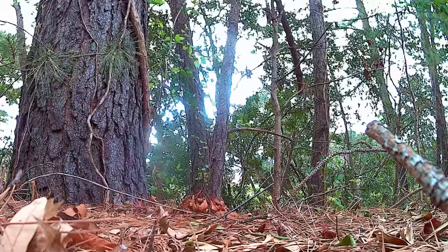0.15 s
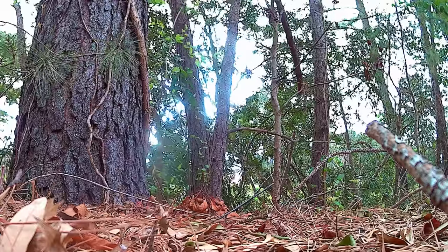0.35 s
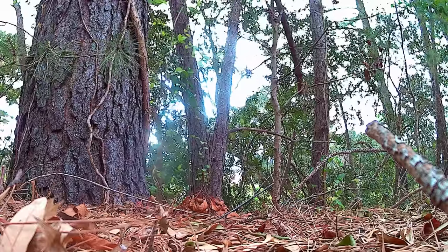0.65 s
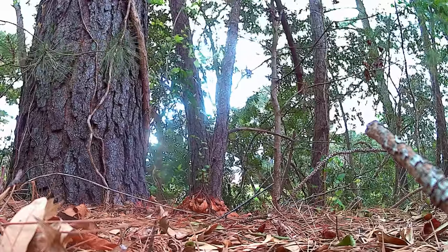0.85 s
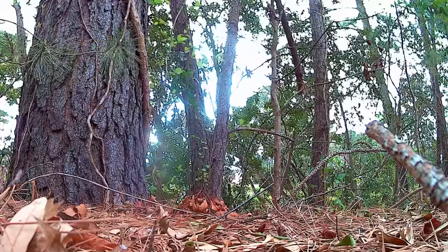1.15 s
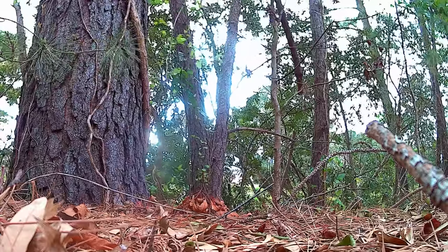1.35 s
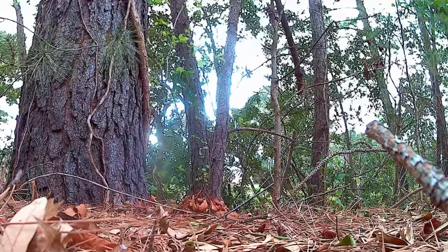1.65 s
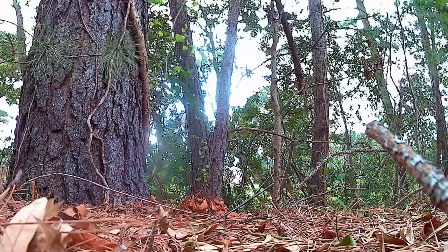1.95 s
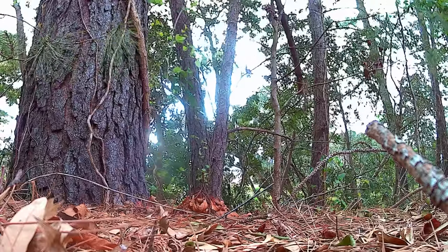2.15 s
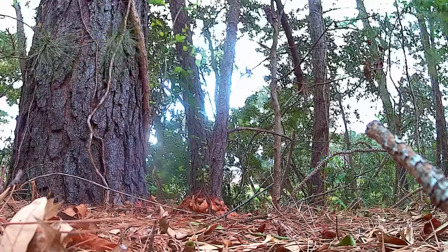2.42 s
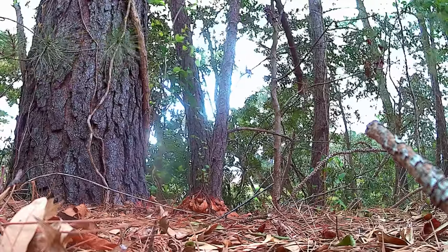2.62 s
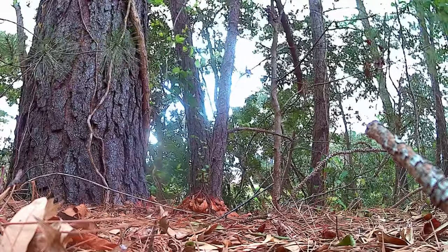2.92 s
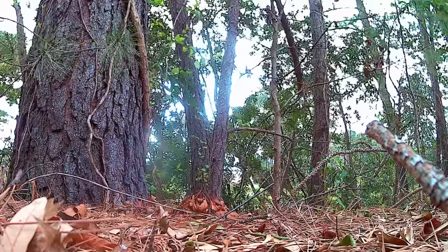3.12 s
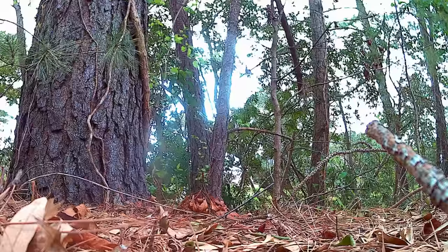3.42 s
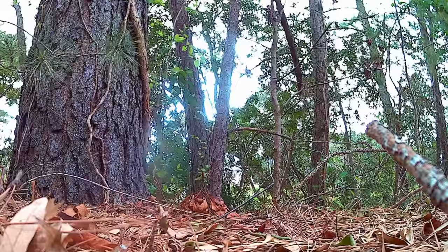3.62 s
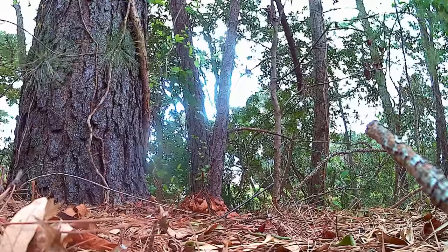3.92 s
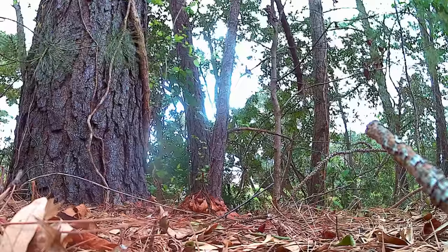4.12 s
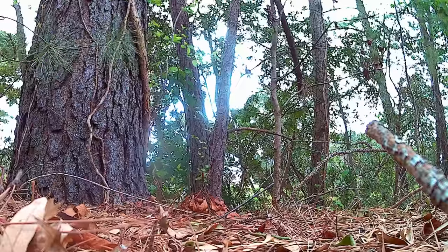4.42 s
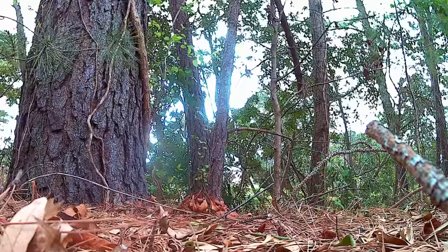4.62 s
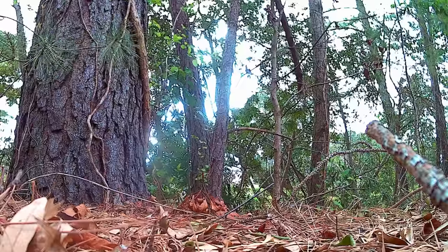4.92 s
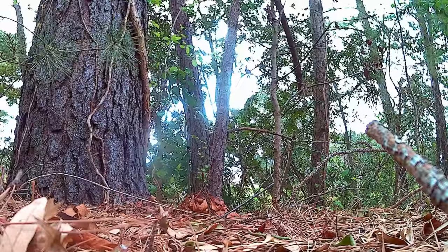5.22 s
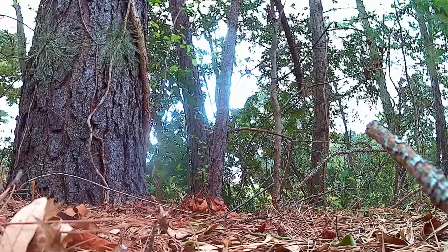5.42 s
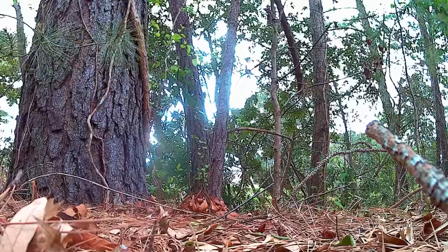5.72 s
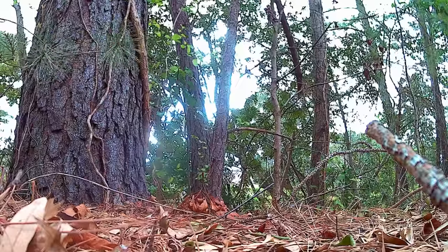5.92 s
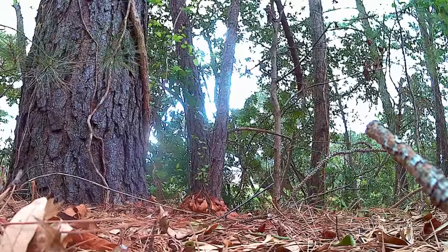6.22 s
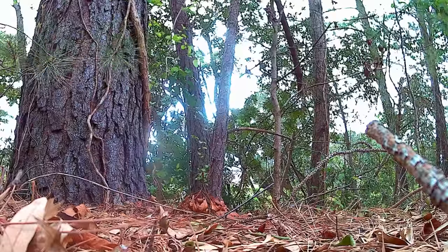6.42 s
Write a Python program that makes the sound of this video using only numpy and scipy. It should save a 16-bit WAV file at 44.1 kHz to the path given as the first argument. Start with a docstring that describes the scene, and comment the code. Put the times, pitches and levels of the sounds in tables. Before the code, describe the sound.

Woodland birdsong: distant thin warbling first, then a near bird's bright slurs, quick whips and growing trills over faint hiss and low wind rumble.

```python
"""A near bird on the right of a pine wood sings varied phrases: bent, nearly pure whistles, often repeated.
Early on, a high warbling song slides from note to note a little to the left and ends in quiet notes.
A third bird gives two spells of thin calls that drop in two steps, among stray notes of other birds.
Trunks scatter the songs as random echoes. Shaped noise makes the foliage hiss, the murmur of the air
and the rumble of wind on the microphone; short noise bursts make ticks in the leaf litter."""
import sys
import numpy as np
from scipy import signal
from scipy.fft import rfft, irfft
from scipy.io import wavfile
from scipy.ndimage import uniform_filter1d, map_coordinates

SR = 44100
rng = np.random.default_rng(int(sys.argv[2]) if len(sys.argv) > 2 else 0)


def put_to_file(sound):
    """Save the sound as 16-bit audio at rate SR, in the file named by the first command-line argument."""
    columns = np.atleast_2d(sound).T  # one column per channel
    safe = np.clip(columns, -1, 1)
    whole_steps = np.round(safe * 32767)
    wavfile.write(sys.argv[1], SR, whole_steps.astype(np.int16))


N = 289296
TIME = np.arange(N) / SR  # seconds

# Syllables of the near bird and the far birds, each one gesture of the syrinx (the bird's voice organ).
# Each holds: length, attack and release in seconds, swell from start to end in dB, overtone in dB,
# then a list of evenly spaced pitches in Hz, before any pitch factor.
DROP = (.039, 0.0042, 0.0095, 0, -31, [3080, 2530, 2177, 2110, 2050])  # falls, then levels out
SCOOP = (0.061, 0.021, 0.014, 5.3, -41, [2970, 2776, 2884, 3130, 3430, 3515, 3640])  # dips, then climbs
SLUR = (.056, .027, 0.011, 3.3, -40, [2400, 2660, 2963, 3304, 3490, 3528])  # climbs smoothly
FLICK = (0.013, 0.0042, 0.005, 3, -18.5, [2300, 3050, 3500])  # very short climb
SIGH = (0.084, .004, 0.0086, -27, -19.5, [1753, 1450, 1317, 1160, 1090])  # low fall that dies away
WHIP = (.035, 0.013, 0.011, -2.3, -30, [5140, 5073, 4725, 4080, 2760, 1760])  # steep fall
PIP = (0.032, 0.0042, 0.0062, 15.8, -32.5, [1450, 1662, 1903, 2076, 2065])  # low climb that swells
SQUEAK = (.079, .008, 0.0063, 15, -10.5, [3100, 3700, 3640, 3570, 3530, 4200, 5120, 5270])  # climbs, holds, climbs again
SWING = (0.14, 0.0036, 0.0034, 0, -34, [4100, 4000, 3880, 3840, 3850, 3970, 4570, 5150])  # sags, then climbs
MEW = (0.1, 0.019, 0.017, -8.5, -40, [2610, 2460, 2187, 2108, 2070, 2100])  # gentle fall
LISP = (0.02, 0.0074, 0.009, 0, -40, [6300, 6840, 7220, 7398])  # very high climb
TICK = (0.011, 0.0072, 0.0049, 2, -23, [7940, 6930, 5360, 2600])  # very short fall from high up
CHUP = (0.014, 0.0016, 0.0037, -13.5, -23, [1890, 1567, 1350, 1240])  # short low fall
WHEEP = (0.038, 0.0081, 0.011, 5.6, -34.5, [1997, 2178, 2550, 2716, 2680])  # low climb
ZIP = (.008, 0.006, 0.0027, 3, -23, [2500, 3400, 5330])  # very short climb
CHIP = (0.026, 0.011, 0.015, 0, -21, [2280, 3940, 5070, 4420, 2900, 2080])  # up and down again
PEEP = (0.04, .01, 0.015, -8, -31, [4460, 3480, 3370, 3363, 3360])  # falls onto a held pitch
PIT = (0.025, 0.011, 0.014, 0, -36, [3350, 3300, 3070])  # short slight fall

# Motifs, groups of syllables repeated together.
# Each row: delay in seconds, syllable, level in dB relative to the trill.
RISING = [(0, FLICK, -13), (.003, SLUR, 0.5)]
TICKING = [(0, LISP, -14), (.02, TICK, 1)]
SEESAW = [(0, CHUP, -18.5), (.058, WHEEP, -1)]

# Whip notes, each answered by a run of three low pips.
# Each row: start in seconds, level in dB, pitch factor of the whip, pitch factor of the pips.
WHIPS = [(2.205, -13.5, 0.99, 0.991), (2.439, -14, 1.001, .97), (2.651, -15.5, 1.004, 1.005)]
# The pips: wait after the whip starts, spacing, level against the whip, change from pip to pip.
PIP_DELAY_S, PIP_EVERY_S, PIP_DB, PIP_GROWTH_DB = .037, 0.042, -12.5, -0.94

# Notes of the near bird outside its trills and whip runs. The high FLICK is an overtone at the start
# of SQUEAK; the half-pitch PEEP is an undertone of the other PEEP.
# Each row: start in seconds, syllable, level in dB, pitch factor.
SINGLES = [(1.653, DROP, -25.5, 1.018), (1.739, SCOOP, -20, 1.008), (2.056, SIGH, -44, 1.004),
           (2.868, FLICK, -33.5, 2.18), (2.869, SQUEAK, -36, 1.003), (4.588, SWING, -32, 1.005),
           (4.798, FLICK, -37, 1.01), (4.802, MEW, -29, 1), (5.708, ZIP, -17, 1.19),
           (5.712, CHIP, -9, 0.98), (5.735, PEEP, -21.5, 1), (5.735, PEEP, -41, .5)]

# Colour of the rasp, the hoarse noise in the near bird's high notes.
# Each row: frequency in Hz, strength in dB per Hz (only the shape counts).
RASP_COLOUR = [(1800, 2), (6000, -8), (8500, 2.5), (10000, 11.5), (15500, -17)]

# The high warbling song.
# Each row: start in seconds, level in dB, length in seconds, slide from Hz, slide to Hz, swell in dB,
# swoop in from above in Hz, depth of the quaver in Hz.
WARBLE = [(.279, -37.5, 0.11, 5156, 5500, 10.5, 1900, -4), (.56, -40, 0.091, 5870, 5750, 3, 1600, 3),
          (.72, -45, 0.1, 4950, 5370, 3, 1700, 0), (.863, -40, 0.064, 6060, 4840, 7, 0, 0),
          (.922, -39, 0.037, 4930, 5390, 8, 0, 4), (1.003, -44, 0.041, 5970, 5800, 0, 1500, 2),
          (1.044, -42.5, .087, 6160, 6610, 0, 0, 480), (1.203, -42.5, 0.054, 7180, 5300, -1, -2, 0),
          (1.308, -42, 0.083, 6300, 4980, -3, 0, 0), (1.39, -53, 0.043, 4840, 4400, 0, 0, 0),
          (1.44, -44, 0.036, 5030, 5320, 4, 2, 2)]
SWOOP_S, QUAVER_HZ, GLIDE_FADE_S = .008, 38, .006

# The calling bird drops onto a held pitch, then slips to a quiet low tail.
# Each row: start in seconds, level in dB, held pitch in Hz, time of the slip in seconds after the start.
CALLS = [(.159, -36, 5430, 0.056), (.459, -37.5, 5360, 0.061), (.806, -45.5, 3775, 0.096),
         (1.139, -41.5, 4500, 0.19), (3.970, -42.5, 5280, 0.08), (4.237, -44.5, 4630, 0.11),
         (4.567, -39.5, 5390, 0.075), (4.892, -44.5, 3840, 0.077), (5.237, -44.5, 4595, 0.13),
         (5.580, -36, 5290, 0.063), (5.894, -43, 3785, .1), (6.201, -35.5, 5500, 0.056),
         (6.497, -35.5, 5180, 0.063)]
CALL_TOP_HZ, CALL_TAIL_HZ, FALL_AT_S, FALL_S, SLIP_S, TAIL_S = 6960, 3270, .017, 0.00375, 0.0039, 0.058
CALL_ATTACK_S, CALL_SAG_DB_PER_S, TAIL_DB = 0.021, -115, -12

# Stray notes of other birds.
# Each row: start in seconds, level in dB, length in seconds, slide from Hz, slide to Hz.
STRAYS = [(.01, -58.5, 0.087, 2450, 2750), (.648, -54.5, .03, 2350, 2650), (.87, -52, 0.034, 2225, 1700),
          (1.06, -44, 0.013, 2000, 5100), (1.197, -48.5, 0.096, 2210, 2590),
          (1.205, -52, 0.061, 3250, 3770), (1.3, -37.5, 0.015, 2790, 4330), (1.46, -54, .06, 2190, 2550),
          (1.411, -42, 0.013, 2610, 1530), (1.515, -43.5, 0.08, 6250, 5760),
          (1.52, -40.5, .075, 5600, 4870), (4.08, -48, .02, 2080, 1820), (4.228, -41.5, 0.013, 1700, 5880),
          (6.13, -61, .07, 3200, 3000)]

# Small dry ticks in the leaf litter. Each row: start in seconds, strength in dB before the snap is shaped.
TICKS = [(0.807, -41), (3.406, -34), (4.728, -30), (5.868, -32), (5.931, -36)]

# Slow level curves of the foliage hiss, the wind rumble and the trees round the warbling bird.
# Each row: time in seconds, level in dB before the overall shift made in background().
HISS = [(0.0, -61), (0.51, -62), (2.68, -68.5), (3.2, -67.5), (4.29, -60), (5.06, -61.5), (6.56, -60.5)]
RUMBLE = [(0.0, -64), (0.55, -62.5), (2.04, -67), (4.44, -48), (6.52, -51.5), (6.56, -59.5)]
TREES = [(0, -56), (1.1, -59), (1.8, -67.5), (2.6, -76), (6.56, -86.5)]

# Colours of the background noises: foliage hiss, murmur of the air, wind rumble and trees.
# Each row: frequency in Hz, strength in dB per Hz (only the shape counts).
HISS_COLOUR = [(900, -13), (1800, -0.5), (3200, -8), (5000, -1.5), (6500, -2), (8500, -2.5), (11500, 3),
               (15500, -7.5)]
LOW_COLOUR = [(50, 9), (120, -0.5), (320, -1.5), (420, -3.5), (700, -5.5), (1200, -10), (2500, -19)]
RUMBLE_COLOUR = [(8, 19), (20, 0), (40, -6.5), (70, -31), (120, -53)]
TREES_COLOUR = [(100, -6.5), (300, -7), (600, 2), (1200, -12), (2200, -11.5), (4000, -9), (6000, -6),
                (8000, -15), (15000, -14.5)]

CUTOFF_HZ = 15900


def near_bird(third_db=17.5, octave_db=-19, rasp_db=-21.0, ring_hz=10000, ring_db=9):
    """Loud and almost dry; forced high syllables turn harsh and splash echoes off the nearest trunks."""
    song = sing(phrases(), jitter=0.0027, flutter_db=1.0)
    top = signal.butter(2, 3700, "high", fs=SR, output="sos")
    high = signal.sosfilt(top, signal.sosfilt(top, song))

    # squares and cubes make overtones that grow faster than the note itself
    overtones = from_db(third_db) * high ** 3 + from_db(octave_db) * high ** 2
    above = signal.butter(6, 7500, "high", fs=SR, output="sos")
    edge = signal.sosfilt(above, overtones)
    # they come in uneven spurts
    edge = edge * (1 + wander(N, 504) / 2)

    # hoarse noise that follows the power of the high notes
    power = uniform_filter1d(high ** 2, size=128)
    rasp = 2 * np.pi * from_db(rasp_db) * power * noise(RASP_COLOUR, alike=1)[0]

    # overtones flare as they pass through a narrow resonance of the throat
    throat = signal.iirpeak(ring_hz, 24, fs=SR)
    flare = from_db(ring_db) * signal.lfilter(*throat, song + edge)

    splash = scatter(high + edge, t60=.065, wet_db=-10.5)
    echo = scatter(song, t60=0.2, wet_db=-21.0)
    return placed(song + edge + flare + rasp + splash + echo, left_db=-25.5)


def phrases():
    """The near bird's song: separate notes, rising slurs, whips with their pips, and two growing trills."""
    rows = SINGLES + trill(RISING, start_s=1.848, count=2, every_s=0.1, db=-19, growth_db=2)
    for s, db, whip_factor, pip_factor in WHIPS:
        pips = trill([(PIP_DELAY_S, PIP, PIP_DB)], s, count=3, every_s=PIP_EVERY_S, db=db,
                     growth_db=PIP_GROWTH_DB, factor=pip_factor)
        rows = rows + [(s, WHIP, db, whip_factor)] + pips
    ticking = trill(TICKING, start_s=4.969, count=4, every_s=.0805, db=-24.5, growth_db=1.7, slowing_s=0.0037)
    seesaw = trill(SEESAW, start_s=5.3005, count=3, every_s=0.1344, db=-16.0, growth_db=1.5)
    return rows + ticking + seesaw


def trill(motif, start_s, count, every_s, db, growth_db=0, slowing_s=0, factor=1):
    """Repeat a motif; each repeat may change in level, and the gaps may widen."""
    rows = []
    for k in range(count):
        repeat_s = start_s + k * every_s + k * (k - 1) / 2 * slowing_s
        for delay_s, syllable, part_db in motif:
            rows.append((repeat_s + delay_s, syllable, db + k * growth_db + part_db, factor))
    return rows


def sing(rows, jitter, flutter_db):
    """Whistle a list of syllables, each at its own time, level and pitch factor."""
    out = np.zeros(N)
    for s, syllable, db, factor in rows:
        pitch, loudness, overtone_db = gesture(*syllable)
        note = whistle(pitch * factor, loudness, overtone_db, jitter, flutter_db)
        add(out, s, from_db(db) * note)
    return out


def gesture(length_s, attack_s, release_s, swell_db, overtone_db, pitches):
    """Pitch, loudness and overtone of a syllable that bends smoothly through its pitches."""
    t = TIME[TIME < length_s]
    place = t / t[-1] * (len(pitches) - 1)
    pitch = map_coordinates(np.array(pitches, float), [place], order=2, mode="nearest")
    return pitch, envelope(t, attack_s, release_s, swell_db), overtone_db


def whistle(pitch, loudness, overtone_db, jitter, flutter_db, third_db=-41, breath_db=-48, beak_hz=7800):
    """The syrinx gives a slightly unsteady near sine; the beak passes the overtone less as it climbs."""
    size = len(pitch)
    unsteady = pitch * (1 + jitter * wander(size, 300))
    phase = 2 * np.pi * np.cumsum(unsteady) / SR
    first, second, third = np.sin(np.outer([1, 2, 3], phase))
    breathy = first * (1 + from_db(breath_db) * wander(size, 2500))
    passed = 1 / (1 + (2 * pitch / beak_hz) ** 20)
    tone = breathy + from_db(overtone_db) * passed * second + from_db(third_db) * third
    return tone * loudness * from_db(flutter_db * wander(size, 110))


def warbler():
    """High slurred notes a little to the left, ringing on among the trees."""
    song = notes(WARBLE, glide, overtone_db=-38.5, jitter=0.0022, flutter_db=1.15)
    echo = scatter(song, t60=0.4, wet_db=-5.0)
    return placed(song, left_db=3.0) + placed(echo, left_db=2.5)


def notes(rows, shape, overtone_db, jitter, flutter_db):
    """Whistle a table of notes that share one rule for pitch and loudness."""
    out = np.zeros(N)
    for s, db, *form in rows:
        pitch, loudness = shape(*form)
        add(out, s, from_db(db) * whistle(pitch, loudness, overtone_db, jitter, flutter_db))
    return out


def glide(length_s, from_hz, to_hz, swell_db=0, swoop_hz=0, quaver_hz=0):
    """Pitch and loudness of a straight slide, which may swoop in from above or quaver."""
    t = TIME[TIME < length_s]
    slide = np.linspace(from_hz, to_hz, len(t))
    swoop = swoop_hz * np.exp(-t / SWOOP_S)
    quaver = quaver_hz * np.cos(2 * np.pi * QUAVER_HZ * t)
    return slide + swoop - quaver, envelope(t, GLIDE_FADE_S, GLIDE_FADE_S, swell_db)


def far_birds():
    """Thin calls, stray notes and pits from deeper in the wood, with more echo; the buzz stays dry."""
    pits = trill([(0, PIT, 0)], start_s=3.255, count=2, every_s=.055, db=-56.5)
    pits = pits + trill([(0, PIT, 0)], start_s=3.73, count=3, every_s=.052, db=-56)
    calls = notes(CALLS, falling_call, overtone_db=-48, jitter=0.013, flutter_db=2.5)
    calls = calls + notes(STRAYS, glide, overtone_db=-28, jitter=0.013, flutter_db=1.5)
    calls = calls + sing(pits, jitter=.012, flutter_db=1.0)
    echo = scatter(calls, t60=0.25, wet_db=-7.5)
    return placed(from_db(-1) * (calls + echo) + buzz(), left_db=-23)


def falling_call(held_hz, slip_s):
    """Pitch and loudness of a call that comes down in two rounded steps."""
    t = TIME[TIME < slip_s + TAIL_S]
    # each step runs smoothly from 0 to 1
    fallen = 1 / (1 + np.exp((FALL_AT_S - t) / FALL_S))
    slipped = 1 / (1 + np.exp((slip_s - t) / SLIP_S))
    pitch = CALL_TOP_HZ + (held_hz - CALL_TOP_HZ) * fallen + (CALL_TAIL_HZ - held_hz) * slipped
    sag_db = CALL_SAG_DB_PER_S * np.maximum(t - CALL_ATTACK_S, 0)
    loudness = envelope(t, CALL_ATTACK_S, TAIL_S / 2) * from_db(sag_db + TAIL_DB * np.sqrt(slipped))
    return pitch, loudness


def buzz(start_s=4.342, length_s=.175, from_hz=3400, to_hz=2580, rate_hz=44, depth=0.088,
         level_db=-45, under_db=-10, over_db=-19):
    """A falling note with fast vibrato; its second partial is the strongest and follows from_hz to to_hz."""
    t = TIME[TIME < length_s]
    swing = 1 - depth * np.cos(2 * np.pi * rate_hz * t)
    # pi instead of 2 pi: the first partial lies an octave below the strongest
    phase = np.pi * np.cumsum(np.linspace(from_hz, to_hz, len(t)) * swing) / SR
    partials = np.sin(np.outer([1, 2, 3], phase))
    tone = from_db([under_db, 0, over_db]) @ partials
    loudness = envelope(t, attack_s=0.0095, release_s=0.019, swell_db=-7)
    out = np.zeros(N)
    add(out, start_s, from_db(level_db) * loudness * tone)
    return out


def litter(per_s=70, crackle_db=-59, spread_db=8.5, t60=0.011):
    """Dry needles and leaves tick: a few clear ones among many tiny ones that follow the foliage hiss."""
    hiss_db = in_time(HISS)
    chance_db = spread_db * np.minimum(rng.exponential(1, N), 3)
    size_db = crackle_db + hiss_db - hiss_db.max() + chance_db
    clicks = (rng.random(N) < per_s / SR) * from_db(size_db)
    for s, db in TICKS:
        add(clicks, s, from_db([db]))
    # every click becomes a short burst of dying noise
    size = SR // 20
    snap = rng.standard_normal(size) * from_db(-60 * TIME[:size] / t60) / 2
    snaps = signal.fftconvolve(clicks, snap)[:N]
    bright = signal.butter(1, 4500, "high", fs=SR, output="sos")
    return placed(signal.sosfilt(bright, snaps), left_db=-6)


def background(hiss_db=6, low_db=-55.5, rumble_db=19.5, trees_db=-3.5):
    """Foliage hiss, the low murmur of the air, wind on the microphone and rustling trees, all shaped noise."""
    hiss_level_db = in_time(HISS) + hiss_db + .5 * wander(N, 25)
    hiss = from_db(hiss_level_db) * noise(HISS_COLOUR, alike=0.65)
    low = from_db(low_db) * noise(LOW_COLOUR, alike=1.0)
    rumble = from_db(in_time(RUMBLE) + rumble_db) * noise(RUMBLE_COLOUR, alike=1.0)
    trees = from_db(in_time(TREES) + trees_db) * noise(TREES_COLOUR, alike=0.296)
    return placed(hiss, left_db=-9.0) + placed(low + rumble, left_db=-8.5) + placed(trees, left_db=4.5)


def noise(colour, alike):
    """Stereo noise of a given spectrum and left-right likeness, falling steeply past its ends."""
    hz, db = np.transpose(colour)
    f = np.log(np.maximum(np.fft.rfftfreq(N, 1 / SR), 1))
    outside = abs(f - np.clip(f, np.log(hz[0]), np.log(hz[-1])))
    gain = from_db(np.interp(f, np.log(hz), db) - 14.7 * outside)
    mid, side = irfft(rfft(rng.standard_normal((2, N))) * gain, N)
    alike = np.clip(alike, -1, 1)
    # what is shared goes to both ears; the rest has opposite signs
    return rms_one(np.sqrt(1 + alike) * mid + np.sqrt(1 - alike) * side * [[1], [-1]])


def scatter(x, t60, wet_db):
    """Dense echoes off trunks and leaves, different at each ear, dying by 60 dB in t60 seconds."""
    t = TIME[:SR]
    echoes = rng.standard_normal((2, SR)) * from_db(-60 * t / t60) * (t > .003)
    echoes /= np.sqrt(np.sum(echoes ** 2, axis=1, keepdims=True))
    return from_db(wet_db) * signal.fftconvolve(x[None], echoes, axes=1)[:, :N]


def placed(x, left_db):
    """Turn the left ear up or down against the right."""
    return x * from_db([[left_db], [0]])


def envelope(t, attack_s, release_s, swell_db=0):
    """Soft attack, a hold that swells or sags, soft release."""
    rise = np.clip(t / attack_s, 0, 1)
    fall = np.clip((t[-1] - t) / release_s, 0, 1)
    fades = (np.sin(rise * np.pi / 2) * np.sin(fall * np.pi / 2)) ** 2
    return fades * from_db(swell_db * (t / t[-1] - .5))


def wander(size, width_hz):
    """Random wobble with a typical size of 1, made of noise with its quick changes smoothed away."""
    sos = signal.butter(2, min(width_hz, SR / 4), fs=SR, output="sos")
    # a tenth of a second extra lets the filter settle
    return rms_one(signal.sosfilt(sos, rng.standard_normal(size + SR // 10))[-size:])


def in_time(rows):
    """Join the points of a level table with straight lines, at every sample."""
    return np.interp(TIME, *np.transpose(rows))


def add(track, s, sound):
    """Mix a sound into the track at time s in seconds."""
    at = max(int(s * SR), 0)
    track[at:at + len(sound)] += sound[:max(N - at, 0)]


def rms_one(x):
    """Scale to an average strength (rms) of 1."""
    return x / np.sqrt(np.mean(x ** 2) + 1e-20)


def from_db(db):
    """Turn decibels into a gain."""
    return 10 ** (np.asarray(db) / 20)


def scene():
    """All the birds over the sound of the wood."""
    return near_bird() + warbler() + far_birds() + litter() + background()


def record(dry):
    """Cut the very top of the sound steeply."""
    low_pass = signal.ellip(10, .1, 70, CUTOFF_HZ, fs=SR, output="sos")
    return signal.sosfilt(low_pass, dry)


dry = scene()
out = record(dry)
put_to_file(out)
```